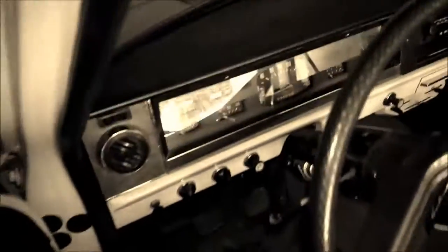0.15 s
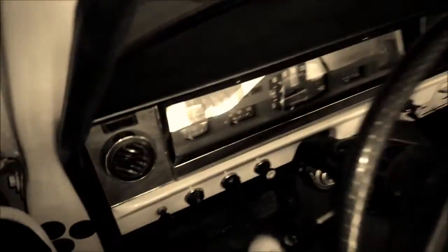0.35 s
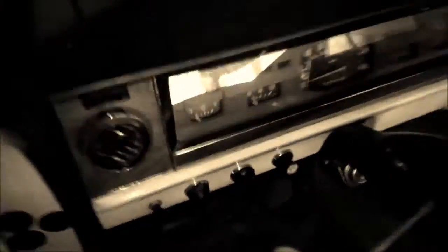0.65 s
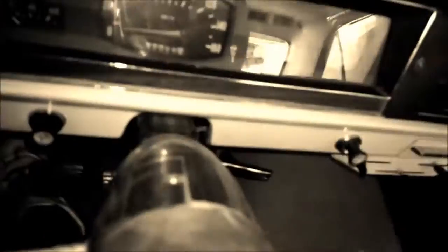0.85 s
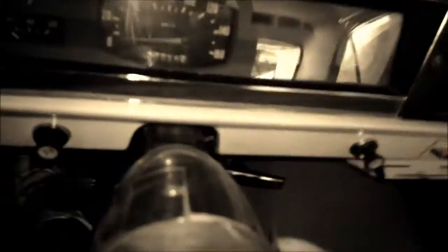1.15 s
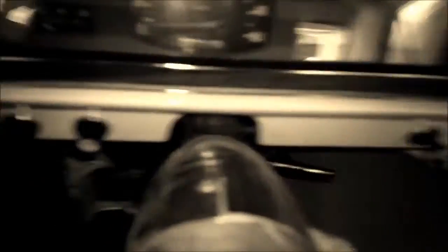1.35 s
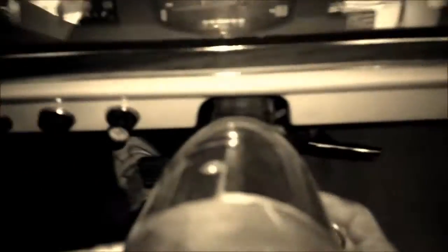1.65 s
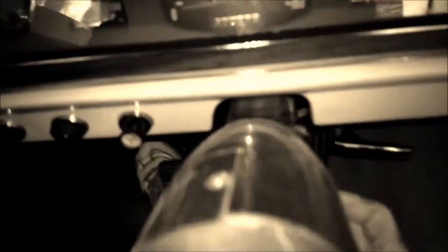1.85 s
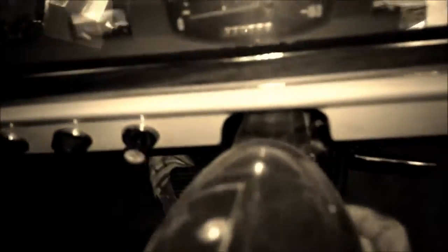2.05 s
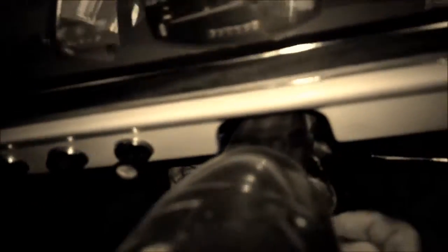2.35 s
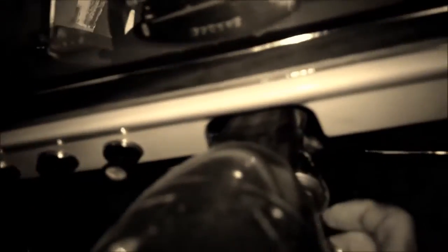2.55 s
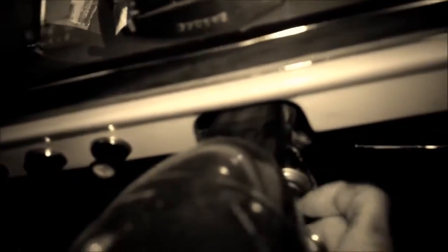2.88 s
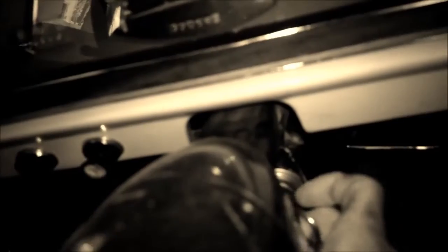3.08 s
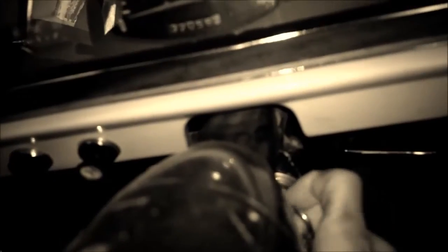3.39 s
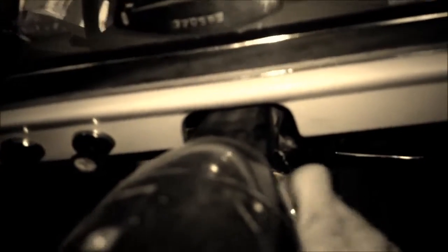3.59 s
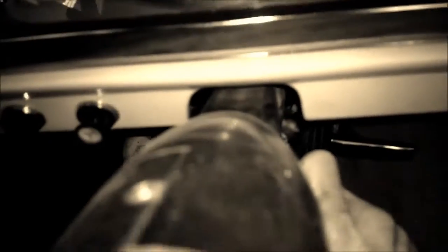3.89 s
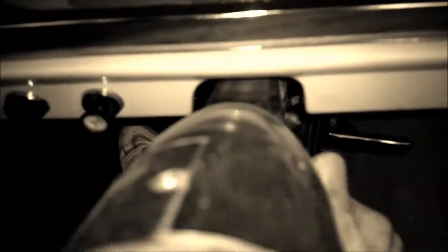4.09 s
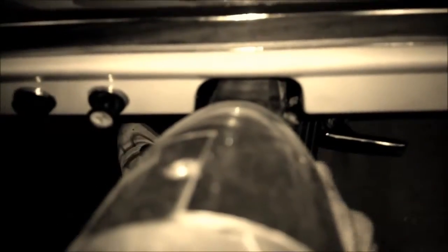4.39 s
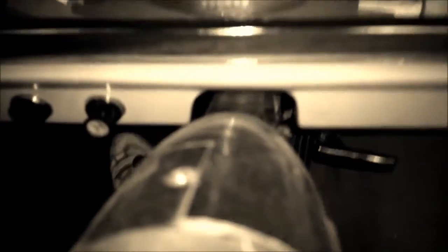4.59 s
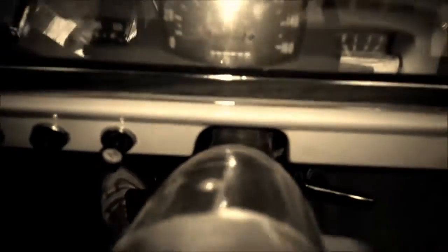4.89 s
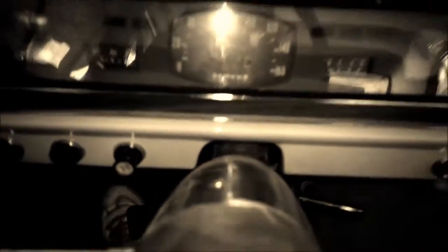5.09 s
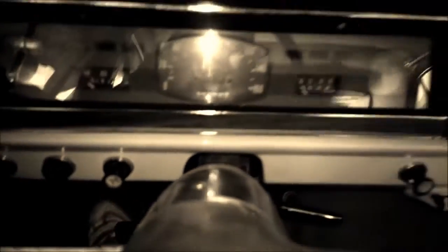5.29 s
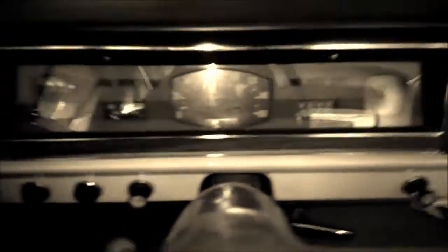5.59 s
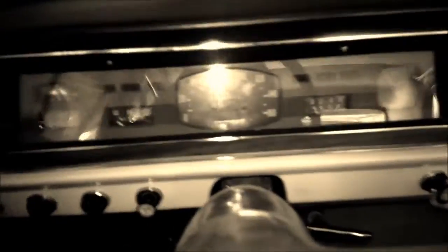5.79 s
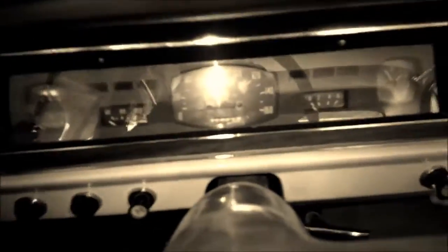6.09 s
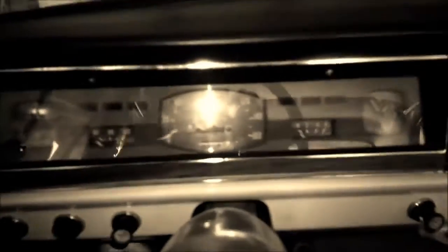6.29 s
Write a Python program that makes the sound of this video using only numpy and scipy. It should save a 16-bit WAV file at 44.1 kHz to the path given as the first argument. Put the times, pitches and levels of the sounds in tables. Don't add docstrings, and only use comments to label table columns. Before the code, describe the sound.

A quiet, dry car cabin, engine off, heard very close on a hand-held stereo microphone; a finger covers the right side, making it dull and boomy. From 0 to 0.5 s there is deep handling rumble and bright sleeve rustle. At 0.8-0.93 s come heavy thumps and a short harsh scrape, the loudest moment, after which the sound ducks and recovers. From 1.2 to 2.3 s a key feels for the lock with faint clicks and light cloth rubs, while soft hollow motor ticks continue to about 4 s. At 3.4-3.52 s quick ratcheting clicks build to a hard metallic snap with a low thud. At 4.23 s a dull knock, then sharp clacks around 4.5 s. Keys jingle brightly at 4.56, 4.9 and 5.14-5.5 s. From 6.0 s to the end, bassy finger thumps and gritty skin slips dominate the right.

```python
import sys
import numpy as np
from scipy import signal
from scipy.fft import rfft, irfft
from scipy.io import wavfile

SR = 44100
rng = np.random.default_rng(int(sys.argv[2]) if len(sys.argv) > 2 else 0)


def inscribe(sig):
    pcm = np.round(np.clip(np.atleast_2d(sig).T, -1, 1) * 32767)
    wavfile.write(sys.argv[1], SR, pcm.astype(np.int16))


def volts_from_db(level):
    exponent = np.asarray(level, float) / 20
    return 10 ** exponent


N = 284170


def rms_one(x):
    return x / np.sqrt(np.mean(x ** 2) + 1e-20)


def peak_one(x):
    return x / np.max(np.abs(x))


def at_hz(points, hz):
    points_hz, level_db = np.transpose(points)
    return np.interp(np.log(hz), np.log(points_hz), level_db)


def coloured(x, spectrum):
    hz = np.maximum(np.fft.rfftfreq(N, 1 / SR), 1)
    return rms_one(irfft(rfft(x) * volts_from_db(at_hz(spectrum, hz)), N))


def flicker(rate_hz, depth_db):
    knots = rng.standard_normal(int(N / SR * 400))
    wander = np.interp(np.arange(N) / SR * rate_hz, np.arange(len(knots)), knots)
    return rms_one(volts_from_db(depth_db * wander))


def stroke(start_s, hold_s, level_db, rise, fall):
    out = np.zeros(N)
    first = max(int((start_s - 90 / rise) * SR), 0)
    last = int((start_s + hold_s + 90 / fall) * SR)
    t = np.arange(first, min(last, N)) / SR
    before = np.maximum(start_s - t, 0)
    after = np.maximum(t - start_s - hold_s, 0)
    out[first:last] = volts_from_db(level_db - rise * before - fall * after)
    return out


def ring(force, hz, t60):
    r, w = volts_from_db(-60 / (t60 * SR)), 2 * np.pi * hz / SR
    return signal.lfilter([0, np.sin(w)], [1, -2 * r * np.cos(w), r * r], force)


def band(x, low_hz, high_hz):
    return signal.sosfilt(signal.butter(2, [low_hz, high_hz], "band", fs=SR, output="sos"), x)


def add(out, start_s, x):
    i = int(start_s * SR)
    out[..., i:i + x.shape[-1]] += x[..., :N - i]


def sides(pan_db):
    ratio = volts_from_db(pan_db)
    return np.array([2 * ratio / (1 + ratio), 2 / (1 + ratio)])


def gain_control():
    t = np.arange(N) / SR - 0.93
    attack_s, recovery_s = 0.024, 0.11
    recovery = np.exp(-np.maximum(t - attack_s, 0) / recovery_s)
    return volts_from_db(-38 * np.clip(t / attack_s, 0, 1) * recovery)


def cabin(x):
    t = np.arange(int(.2 * SR)) / SR
    echoes = rng.standard_normal(len(t)) * volts_from_db(-60 * t / .07) * (t > .003)
    return x + volts_from_db(-11) * signal.fftconvolve(x, echoes / np.sqrt(np.sum(echoes ** 2)))[:N]


def covered_port(x):
    port_hz, width_hz = 700, 450
    r, w = np.exp(-np.pi * width_hz / SR), 2 * np.pi * port_hz / SR
    a = [1, -2 * r * np.cos(w), r * r]
    cavity = signal.lfilter([sum(a)], a, x)
    return np.array([x, signal.lfilter([1 - r], [1, -r], cavity)])


def late_right(pair):
    return np.array([pair[0], np.pad(pair[1], (15, 0), "edge")[:N]])


# hz, level_db [dB per Hz]
HISS_SPECTRUM = [(120, -33.5), (200, 3), (300, -8), (606, -3.5), (1090, -18), (3500, -16), (15000, -24.5),
                 (16500, -35.5)]


def hiss():
    return coloured(rng.standard_normal((2, N)), HISS_SPECTRUM) * volts_from_db(-72) * gain_control()


# start_s, hold_s, level_db
HUM_SWELLS = [
    (0, 0.26, -73),
    (1.37, 0.07, -68),
    (5.14, 0.27, -68.5),
    (6.18, 0.27, -79.5),
]


def hum():
    swell = volts_from_db(-86.5) + sum(stroke(*row, 74.5, 74.5) for row in HUM_SWELLS)
    hz, t60_s = 278.4, .035
    once = ring(rng.standard_normal(N), hz, t60_s)
    return rms_one(ring(once, hz, t60_s)) * swell


# time_s, boom_db, left_right_db
GRIP_COURSE = [(0.0, -36, -1), (0.45, -60, -7), (0.75, -56.5, -19), (0.9, -69.5, 4), (1.02, -85.5, 1.5),
               (1.29, -70, -1), (2.55, -80, -2), (3.35, -68, -2), (3.53, -37, -2.5), (3.71, -65, -1),
               (4.2, -71, 0), (5.92, -71, -3), (6.22, -66, -10.5), (6.44, -58.5, -20)]
# hz, level_db [dB per Hz]
DEEP_BOOM = [(12, -1.5), (25, 8), (45, 12.5), (75, 7), (110, -35), (200, -57.5)]
# hz, level_db [dB per Hz]
UPPER_BOOM_SPECTRUM = [(50, -23.5), (85, 5), (130, 1.5), (200, -6.5), (300, -17.5), (500, -25),
                       (1000, -70.5)]


def grip():
    time_s, boom_db, left_right_db = np.transpose(GRIP_COURSE)
    deep_db = np.interp(np.arange(N) / SR, time_s, boom_db)
    pan_db = np.interp(np.arange(N) / SR, time_s, left_right_db)
    shaken = sum(stroke(s, 0.004, db - 24, 404.5, 300) for s, db, *_ in CASING_BLOWS + FINGER_PRESSES)
    shared, own = rng.standard_normal(N), rng.standard_normal((2, N))
    deep = coloured(shared + 0.13 * own, DEEP_BOOM) * flicker(14, 2.0) * volts_from_db(deep_db + 2.5)
    upper_gain = volts_from_db(deep_db - 13.5) + volts_from_db(-68.5) + shaken
    upper = coloured(shared + 0.83 * own, UPPER_BOOM_SPECTRUM) * flicker(22, 2.5) * upper_gain
    return (deep + upper * gain_control()) * sides(pan_db)


# start_s, hold_s, rub_db, left_right_db
SKIN_MOVES = [(0.0, 0.032, -75, 1), (0.13, 0.19, -77, 12), (0.74, 0.15, -77, -3.5),
              (1.423, 0.29, -82.5, 5.5), (1.808, 0.043, -65, -7), (2.04, 0.017, -70.5, -7),
              (3.133, 0.13, -87, -9), (3.706, 0.057, -87, 7), (4.066, 0.06, -74, 6.5),
              (4.767, 0.022, -71.5, 2), (5.5, 0.53, -84.5, 5.5), (6.028, 0.02, -67, -2.5),
              (6.284, .2, -59.5, -26)]
# hz, level_db [dB per Hz]
RUB_SPECTRUM = [(120, -36.5), (200, -10), (342, -1), (687, -7), (2040, -15.5), (2910, -46), (7000, -49.5),
                (15400, -110)]


def skin():
    moves = sum(stroke(s, hold, db, 211, 156.5) * sides(pan_db)[:, None]
                for s, hold, db, pan_db in SKIN_MOVES)
    grains = rng.standard_normal((2, N)) * flicker(400, 3.5) * flicker(60, 2.5)
    return coloured(grains, RUB_SPECTRUM) * volts_from_db(1.5) * (volts_from_db(-77) + moves)


# start_s, peak_db
MOTOR_STEPS = [(0.439, -63), (0.591, -55), (0.666, -63), (0.692, -56.5), (1.303, -56.5), (1.523, -61),
               (1.628, -56), (1.932, -54.5), (2.094, -52), (2.322, -62.5), (2.431, -53), (2.525, -52),
               (2.632, -49.5), (2.892, -52.5), (2.969, -52.5), (2.995, -49), (3.127, -52.5), (3.225, -48),
               (3.326, -54), (3.429, -57), (3.526, -42), (3.624, -55.5), (3.726, -49), (3.834, -47.5),
               (3.926, -51), (4.036, -62.5), (4.998, -61), (5.226, -54.5), (5.323, -53), (5.46, -54.5),
               (5.661, -58.5), (5.756, -61)]


def ticks():
    out, t = np.zeros((2, N)), np.arange(1200) / SR
    for (s, db), (detune, soft) in zip(MOTOR_STEPS, rng.random((len(MOTOR_STEPS), 2))):
        rise_s = 0.002 + 0.0053 * soft
        decay = np.exp(-(np.maximum(t - rise_s, 0) / 0.0043) ** 2)
        shape = np.minimum(t / rise_s, 1) ** 2 * decay
        hz = 680 + 60 * detune
        add(out, s - rise_s / 2, volts_from_db(db) * shape * np.sin(2 * np.pi * hz * t) * sides(-14)[:, None])
    return out


# start_s, hold_s, dull_db, bright_db
SLEEVE_STROKES = [(0.183, 0.067, -74, -53), (0.295, 0.038, -64, -58), (0.367, 0.17, -74.5, -66),
                  (0.784, 0.13, -59.5, -55), (1.251, 0.057, -90.5, -76), (1.411, 0.016, -76.5, -73),
                  (1.596, 0.073, -71, -70), (2.082, 0.024, -76, -93), (2.28, 0.015, -77.5, -76),
                  (3.29, 0.4, -91, -83), (3.767, 0.1, -69.5, -77), (5.164, 0.26, -67.5, -77),
                  (5.974, .5, -72.5, -85.5)]
# hz, level_db [dB per Hz]
DULL_RUSTLE = [(470, -23.5), (800, -26.5), (924, -7), (1760, -1), (1920, -1), (3450, -2), (5570, -4),
               (14000, -24.5)]
# hz, level_db [dB per Hz]
BRIGHT_SWISH = [(880, -36.5), (1500, -4), (1610, -8.5), (3030, -10.5), (4130, 5), (14600, 1), (16000, -4.5),
                (16500, -22.5)]


def rustle():
    shapes = np.array([stroke(s, hold, 0, 145.5, 256) for s, hold, *_ in SLEEVE_STROKES])
    rest = volts_from_db([[-75.5], [-88.5]])
    dull_gain, bright_gain = volts_from_db(np.transpose(SLEEVE_STROKES)[2:]) @ shapes + rest
    dull = coloured(rng.standard_normal(N) * flicker(99, 2.8), DULL_RUSTLE)
    bright = coloured(rng.standard_normal(N) * flicker(71, 1.4), BRIGHT_SWISH)
    return volts_from_db(3) * (dull * dull_gain + bright * bright_gain)


# start_s, peak_db, ring_hz, t60_s
CASING_BLOWS = [(0.882, -17.5, 132.4, 0.051), (.91, -14.5, 140.3, 0.037), (.984, -62, 200, .05),
                (1.246, -51, 116, 0.053), (2.29, -57.5, 58, 0.39), (2.3, -58, 119, 0.13),
                (3.208, -55.5, 115.5, 0.36), (3.23, -55, 61.4, 0.28), (3.486, -29, 71, 0.18),
                (3.502, -22.5, 70.3, 0.084), (3.524, -29, 112.8, 0.18), (3.595, -34.5, 59, 0.25),
                (4.234, -39.5, 114.3, 0.24), (4.253, -37.5, 147.5, 0.017), (4.562, -45, 101, 0.28),
                (4.591, -45, 63.6, 0.32), (5.06, -53.5, 111, 0.23), (5.31, -52.5, 109.4, 0.2),
                (5.685, -51, 181.4, 0.2), (5.701, -51.5, 82.3, 0.39), (5.949, -44.5, 77.4, 0.43)]
# start_s, peak_db,
# ring_hz, t60_s, edge_hz
FINGER_PRESSES = [(0.06, -36, 31, 1, 120), (0.19, -34, 30.3, 0.24, 120), (0.47, -44, 33.6, 1, 120),
                  (6.151, -34.5, 30.2, 0.23, 120), (0.781, -21, 38.4, 0.13, 360),
                  (.8678, -26, 664, 0.023, 2480), (6.008, -53, 41.5, 0.11, 900),
                  (6.029, -23, 65, 0.14, 320), (6.036, -35.5, 513, 0.011, 1530),
                  (6.134, -40.5, 69, 0.41, 150), (6.289, -19, 66.4, 0.056, 497),
                  (6.377, -38, 718, 0.057, 1210), (6.398, -30, 440, 0.018, 850)]


def thumps():
    out, t = np.zeros((2, N)), np.arange(12000) / SR
    blows = [(*row, max(270 + 11 * row[1], 2.47 * row[2]), -2.5) for row in CASING_BLOWS]
    presses = [(*row, -30) for row in FINGER_PRESSES]
    for s, db, hz, t60, edge_hz, pan_db in blows + presses:
        swing = volts_from_db(-60 * t / t60) * np.cos(2 * np.pi * hz * t)
        soft = signal.sosfilt(signal.butter(2, edge_hz, fs=SR, output="sos"), swing)
        pull = -1 if s < 1 else 1
        add(out, s, pull * volts_from_db(db) * peak_one(soft) * sides(pan_db)[:, None])
    return out


# start_s, hold_s, rub_db
PORT_SLIPS = [
    (6.142, 0.0093, -51.5),
    (6.161, 0.022, -53),
    (6.193, 0.026, -53.5),
    (6.299, 0.036, -44.5),
    (6.362, 0.0098, -53),
    (6.405, 0.026, -62),
    (6.437, .03, -43),
]
# hz, level_db [dB per Hz]
SLIP_SPECTRUM = [(150, 1), (250, -7), (480, -3), (669, 4), (1430, -4), (2240, -14), (3000, -29),
                 (7800, -42.5)]


def slide():
    moves = sum(stroke(*row, 1205, 900) for row in PORT_SLIPS)
    grains = rng.standard_normal((2, N)) * flicker(300, 4.5) * flicker(60, 3.5)
    return coloured(grains, SLIP_SPECTRUM) * moves * sides(-21)[:, None]


# start_s, peak_db
SCRAPE_CATCHES = [
    (0.8685, -29),
    (0.881, -24),
    (0.912, -27),
]
# hz, level_db [dB per Hz]
SCRAPE_SPECTRUM = [(40, -28.5), (147, -5), (334, -15.5), (759, -7.5), (1330, -19), (3180, -23.5),
                   (9300, -42), (14500, -38.5)]
# hz, left_right_db
SCRAPE_BALANCE = [(60, -6), (200, -6), (380, -6.5), (700, -15.5), (1290, 2), (2380, 19), (4400, 40.5)]


def scrape():
    grit = (rng.standard_normal(N) + .5 * rng.standard_normal((2, N))) * flicker(250, 2.5)
    hz, tone_db = np.transpose(SCRAPE_SPECTRUM)
    shares = sides(at_hz(SCRAPE_BALANCE, hz))
    pair = [coloured(g, np.c_[hz, tone_db + 20 * np.log10(share)]) for g, share in zip(grit, shares)]
    t, start_s, end_s = np.arange(N) / SR, SCRAPE_CATCHES[0][0], 0.9277
    drag = volts_from_db(-29.5) + sum(stroke(s, 0.00033, db, 20000, 4500) for s, db in SCRAPE_CATCHES)
    tail = stroke(end_s, 0, -41.5, 3000, 902)
    level = drag * (t > start_s - .001) * (t < end_s) + tail
    spike = -volts_from_db(-8) * np.exp(-((t - start_s) / .00012) ** 2) * [[1], [0]]
    return np.array(pair) * level * volts_from_db([[-2.5], [1.5]]) + spike


# start_s, peak_db, ring_hz, t60_s
STRUCK_PARTS = [(1.311, -67, 1520, .03), (1.378, -65, 1100, 0.043), (1.4, -65, 700, .04),
                (1.425, -62, 1090, .03), (1.483, -66, 1640, 0.054), (1.485, -68, 1080, .04),
                (1.522, -65, 1300, .02), (1.58, -62.5, 1090, .03), (1.634, -41, 4650, .006),
                (1.6355, -47, 7700, .004), (1.837, -48, 3780, 0.076), (1.839, -51.5, 2930, 0.076),
                (3.4147, -39, 10500, .004), (3.4395, -38, 14000, .005), (3.462, -39, 14500, .006),
                (3.467, -36, 5800, .008), (3.482, -39, 7300, .005), (3.4995, -25, 5060, .005),
                (3.4975, -22, 2640, .018), (3.5005, -23, 3270, .015), (3.5005, -27, 7200, .005),
                (3.502, -27, 3700, .008), (3.502, -29, 4300, .006), (4.503, -47, 4200, .005),
                (4.528, -34, 4650, .007), (4.5285, -30.5, 7400, .007), (4.528, -25, 14200, .005),
                (4.551, -41, 7800, .004), (4.551, -35, 14200, .005), (4.531, -39, 1700, .012),
                (4.558, -38, 1550, .012), (4.612, -51, 7670, .045), (4.772, -49, 3780, 0.0055),
                (4.771, -54, 8500, .007), (4.789, -57, 5400, .01), (4.896, -53, 3660, .04),
                (4.9355, -40, 11670, .045), (4.9355, -44, 12050, 0.059), (5.157, -52, 15600, .04),
                (5.3729, -43, 3350, 0.0054), (5.3725, -54, 5000, .005), (5.388, -45, 12840, .14)]


def pins():
    out, t = np.zeros(N), np.arange(5000) / SR
    for (s, db, hz, t60), grit in zip(STRUCK_PARTS, rng.standard_normal((len(STRUCK_PARTS), len(t)))):
        force = grit * volts_from_db(-60 * t / .015) * np.minimum(t / .0007, 1)
        part = band(ring(force, hz, t60), .6 * hz, min(1.5 * hz, 20000))
        add(out, s, volts_from_db(db + 6) * peak_one(part))
    return out


# start_s, peak_db, centre_hz, t60_s
PANEL_KNOCKS = [(1.84, -45, 500, 0.19), (2.08, -52.5, 400, 0.093), (3.504, -36.5, 495, 0.074),
                (3.512, -44.5, 916, 0.14), (4.2317, -47, 400, 0.12), (4.503, -53.5, 403, 0.073),
                (4.526, -36, 520, 0.078), (4.557, -40, 300, .07), (4.549, -39, 480, 0.2),
                (4.768, -47, 500, 0.15), (5.373, -44.5, 460, 0.13)]


def knocks():
    out, t = np.zeros(N), np.arange(7000) / SR
    for (s, db, hz, t60), grit in zip(PANEL_KNOCKS, rng.standard_normal((len(PANEL_KNOCKS), len(t)))):
        force = grit * volts_from_db(-60 * t / t60) * np.minimum(t / 0.004, 1)
        add(out, s, volts_from_db(db + 4.5) * peak_one(band(force, 0.4 * hz, 1.44 * hz)))
    return out


# mode_hz, level_db, t60_s
KEY_MODES = [(6724, -15, .1), (6900, -7, .13), (7725, -12, .09), (8226, -7, .11), (9356, -7, .12),
             (10510, -4, .16), (11620, -4, .13), (12080, -6, .12), (12310, -7, .1), (12840, -6, .14),
             (13720, -14, .1), (14500, -12, .08), (15250, -3, .06), (15670, -1, .06)]


def nearest_key(hz):
    return min((f for f, *_ in KEY_MODES), key=lambda f: abs(f - hz))


# start_s, peak_db, lower_key_hz, upper_key_hz, chatter_s
KEY_CONTACTS = [(4.5585, -42, 12310, 12080, 0.024), (4.559, -43, 10510, 10510, .058),
                (4.609, -49, 7725, 15670, .018), (4.873, -63, 6900, 12080, .008),
                (4.8937, -35, 9356, 12080, 0.026), (4.92, -48, 10510, 12080, 0.0099),
                (4.9345, -41, 11620, 12080, 0.016), (5.062, -69.5, 9356, 11620, 0.016),
                (5.141, -42.5, 11620, 8226, .012), (5.154, -44, 6900, 11620, 0.037),
                (5.257, -45, 12840, 12310, .03), (5.267, -46, 9356, 10510, 0.055),
                (5.276, -42.5, 6900, 12080, 0.057), (5.329, -38, 8226, 11620, .035),
                (5.345, -44.5, 8226, 10510, .055), (5.371, -46, 6900, 11620, 0.025),
                (5.3865, -38, 12840, 12840, 0.045), (5.432, -54, 6900, 12080, 0.023),
                (5.507, -61, 12840, 11620, 0.022)]


def jangle():
    out, t = np.zeros(N), np.arange(4000) / SR
    noise = rng.standard_normal((len(KEY_CONTACTS), len(t)))
    luck = rng.normal(0, 3.5, (len(KEY_CONTACTS), len(KEY_MODES)))
    for (s, db, low_hz, high_hz, lasts), grit, chance in zip(KEY_CONTACTS, noise, luck):
        force = grit ** 3 * volts_from_db(-30 * t / 0.051) * np.minimum(t / 0.00065, 1)
        bunch = sum(volts_from_db(g + c) * ring(force, f, 0.35 * d) for (f, g, d), c in zip(KEY_MODES, chance))
        front = force * volts_from_db(-30 * t / 0.016)
        upper = ring(front, nearest_key(high_hz), 0.16)
        lower = ring(front, nearest_key(low_hz), 0.11)
        pair = upper + volts_from_db(-7.5) * lower
        clean = 1.6 if low_hz == high_hz else .4
        scratch = band(band(force, 6800, 20900), 5800, 20800)
        keys = clean * peak_one(pair) + 0.7 * peak_one(bunch) + 0.39 * peak_one(scratch)
        damped = volts_from_db(-1800 * np.maximum(t - lasts, 0))
        add(out, s, volts_from_db(db + 4.5) * damped * peak_one(keys))
    return out


# mode_hz, level_db, t60_s
HOUSING_MODES = [(1697, -8, 0.057), (2188, -5, 0.026), (2650, -10.5, 0.036), (3250, 7, 0.027),
                 (3900, 1, 0.024), (5770, 1.5, 0.017), (7350, 5, 0.0097)]
# start_s, peak_db, ring_hz, treble_db [re peak], rattle_t60_s
KEY_FUMBLES = [(1.235, -68, 6840, -15, 0.17), (1.258, -63, 7020, -20, .12), (1.285, -61, 5840, -24, 0.17),
               (1.328, -59, 6300, -16, 0.09), (1.412, -60, 3900, -10, .09), (1.629, -55, 7640, -14, .02),
               (1.6336, -43, 4460, -6, 0.03), (1.6365, -47, 7900, -6, 0.015), (1.771, -51, 4000, -8, 0.053),
               (1.778, -53.5, 7050, -12, .05), (1.832, -48, 5400, -12, 0.046),
               (1.838, -45, 3850, -10, 0.066), (1.844, -50, 3140, -20, 0.032),
               (1.85, -48, 4060, -18, 0.048), (2.0563, -45, 4100, -12, 0.077),
               (2.077, -51, 7200, -14, 0.079), (2.2527, -63, 2600, 9, 0.034), (2.2695, -56, 5950, 4, .02),
               (2.29, -55.5, 5970, -1, 0.12), (2.871, -59.5, 3720, -9, 0.14)]
BARREL_TURN = [(3.4012, -60, 7900, -5, 0.08), (3.415, -38.5, 2500, 10, 0.059),
               (3.4383, -39.5, 1950, 9.5, 0.044), (3.447, -45, 1950, -4.5, 0.081),
               (3.462, -32.5, 2200, 3.5, 0.07), (3.482, -26, 2620, -4.5, 0.044),
               (3.496, -32, 13000, 2, 0.07), (3.5012, -19, 2640, -7, .03), (3.507, -24, 2650, -8, 0.024),
               (3.516, -34, 3250, -5, 0.032), (3.577, -58, 2650, -20, .03), (3.6, -62, 2650, -20, 0.025)]
BARREL_RELEASE = [(4.2312, -53.5, 1950, -21.5, 0.064), (4.248, -62.5, 2210, -19.5, 0.052),
                  (4.4086, -45.5, 2780, -5, 0.066), (4.466, -58, 2580, -31, 0.11),
                  (4.5028, -42, 2700, -14, 0.058), (4.529, -25, 3000, -12, 0.026),
                  (4.534, -32.5, 3230, -12, 0.055), (4.5514, -31, 2840, -15, 0.054),
                  (4.557, -36, 1570, -2, 0.096), (4.6115, -55, 2700, -8, .06),
                  (4.7706, -44.5, 2790, -7.5, 0.047), (4.787, -50.5, 2650, -14.5, 0.079),
                  (5.249, -52.5, 6750, -18, 0.13), (5.3731, -36.5, 2650, -15, 0.068),
                  (5.431, -54, 2630, -14, 0.088), (5.467, -63.5, 2900, -8, 0.064)]


def snaps():
    out, t = np.zeros(N), np.arange(4000) / SR
    rows = KEY_FUMBLES + BARREL_TURN + BARREL_RELEASE
    noise = rng.standard_normal((len(rows), len(t)))
    luck = rng.normal(0, 2.6, (len(rows), len(HOUSING_MODES)))
    for (s, db, hz, treble_db, t60), grit, chance in zip(rows, noise, luck):
        rise_s = .0004 + .0045 * volts_from_db(db + 14)
        after = np.maximum(t - rise_s, 0)
        decay = .64 * volts_from_db(-60 * after / t60) + .55 * volts_from_db(-60 * after / .006)
        force = grit * decay * np.minimum(t / rise_s, 1) ** 2
        body = sum(volts_from_db(g + c) * ring(force, f, d) for (f, g, d), c in zip(HOUSING_MODES, chance))
        main = ring(force, hz, 0.012)
        spread_hz = (1.27 + 1.4 * (db + 45)) * hz
        grain = band(force, 0.85 * hz, np.clip(spread_hz, 1.15 * hz, max(6500, 0.89 * hz)))
        mixed = 0.29 * peak_one(body) + 0.5 * peak_one(main) + 0.9 * peak_one(grain)
        dull = peak_one(band(mixed, 1400, 18000))
        crack = peak_one(band(force, 6000, 8600) + band(force, 10800, 18000))
        add(out, s - rise_s, volts_from_db(db + 7.5) * (dull + volts_from_db(treble_db) * crack))
    return out


def scene():
    gain = gain_control()
    metal = cabin(snaps() + knocks() + jangle())
    ducked = gain * (covered_port(metal + rustle() * gain) + hum() + skin())
    casing = grip() + thumps() + ticks() + scrape() + slide()
    return late_right(ducked + casing + covered_port(pins()))


def low_pass(x):
    return signal.sosfilt(signal.butter(12, 16820, fs=SR, output="sos"), x)


def record(dry):
    fade_in = np.sin(np.pi / 2 * np.minimum(np.arange(N) / SR / .006, 1)) ** 2
    top_cut = signal.cheby2(10, 50, 16500, fs=SR, output="sos")
    mix = signal.sosfilt(top_cut, (dry + hiss()) * fade_in)
    return low_pass(mix)


dry = scene()
out = record(dry)
inscribe(out)
```